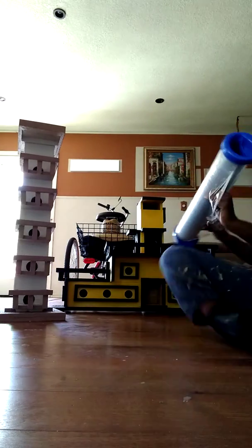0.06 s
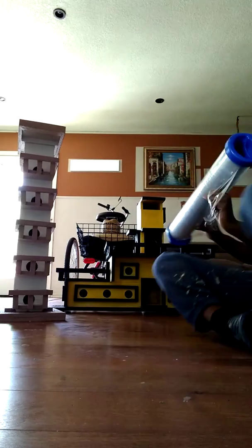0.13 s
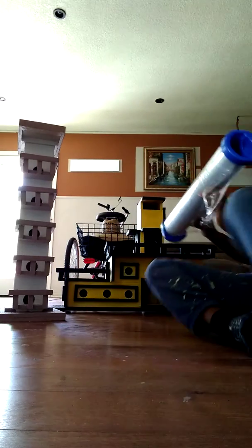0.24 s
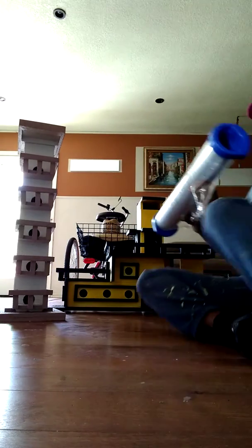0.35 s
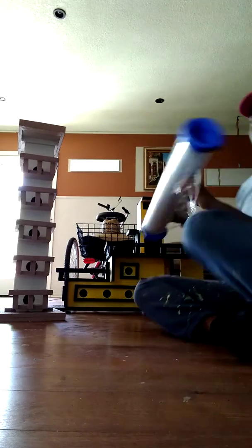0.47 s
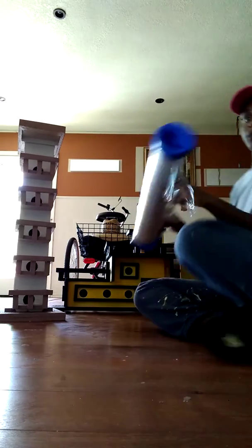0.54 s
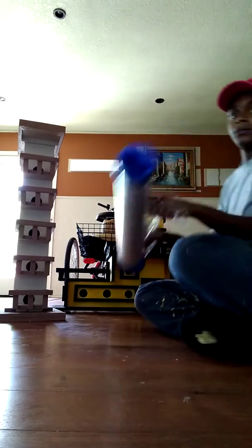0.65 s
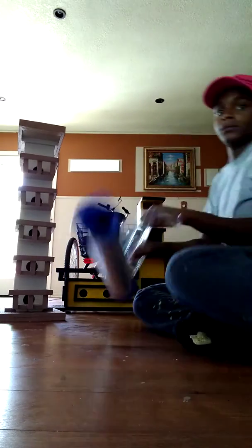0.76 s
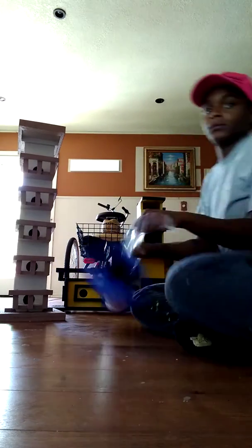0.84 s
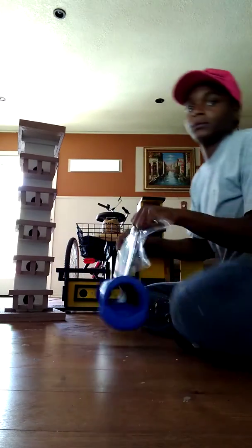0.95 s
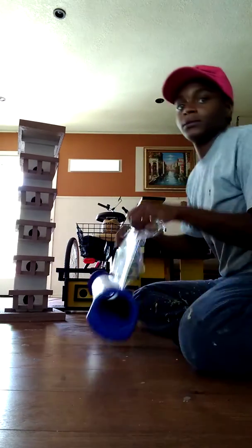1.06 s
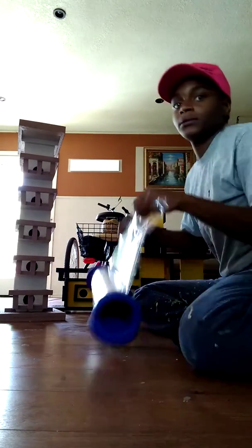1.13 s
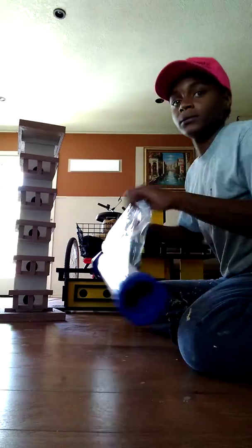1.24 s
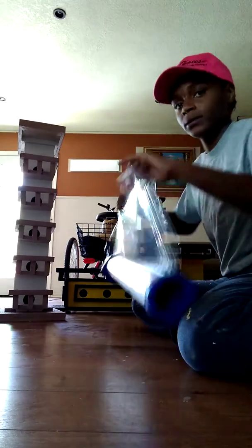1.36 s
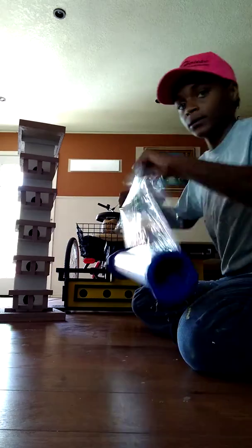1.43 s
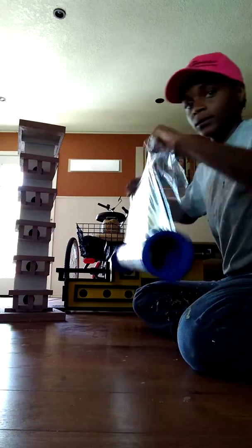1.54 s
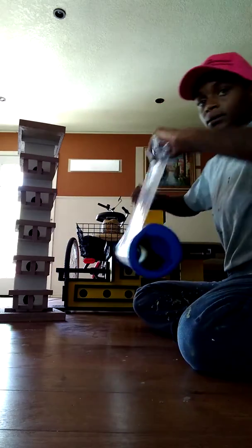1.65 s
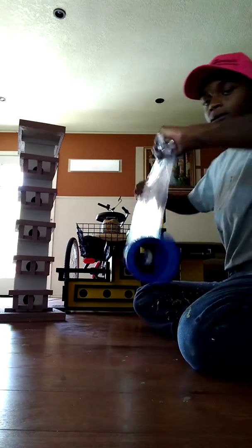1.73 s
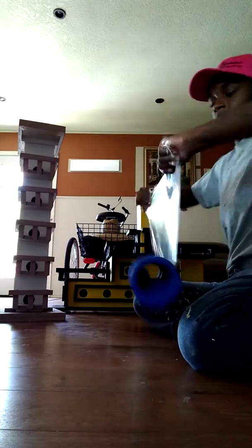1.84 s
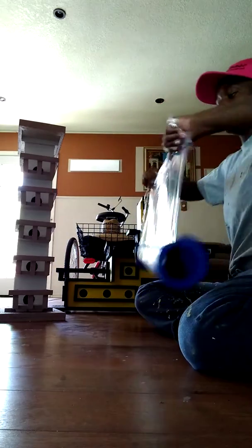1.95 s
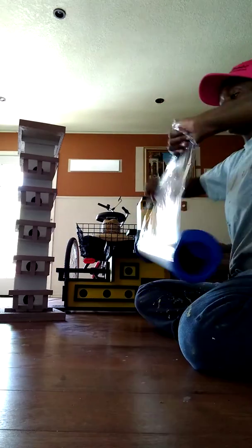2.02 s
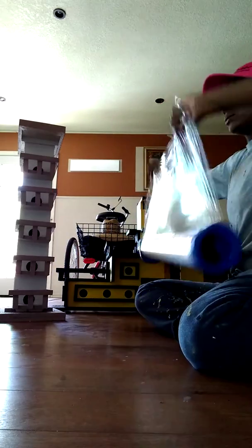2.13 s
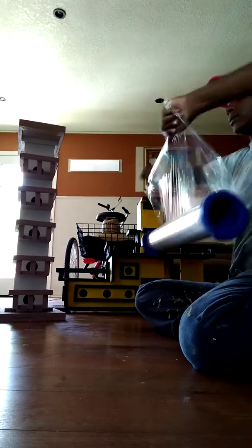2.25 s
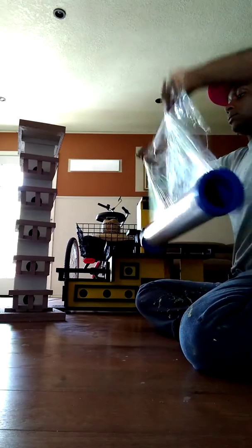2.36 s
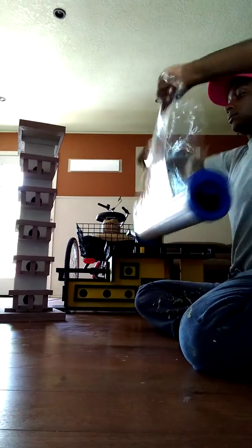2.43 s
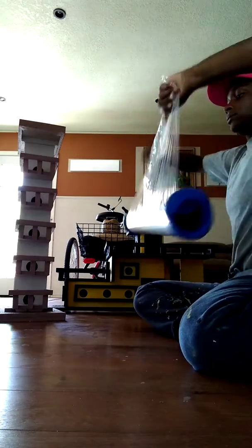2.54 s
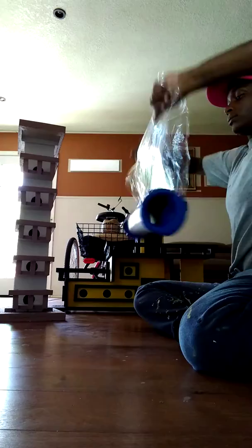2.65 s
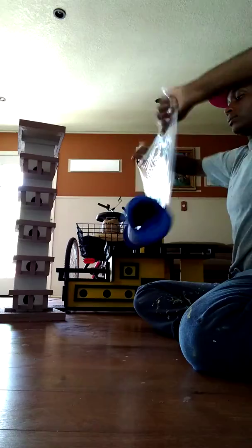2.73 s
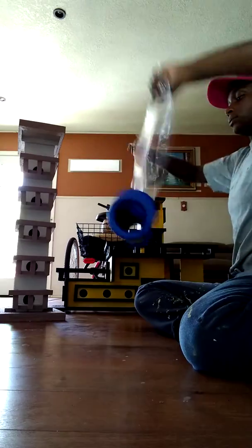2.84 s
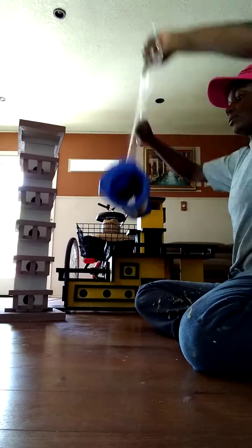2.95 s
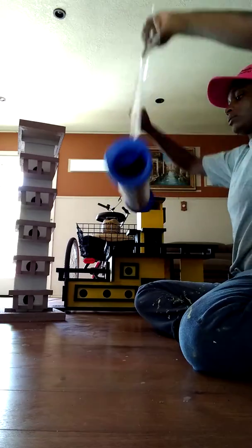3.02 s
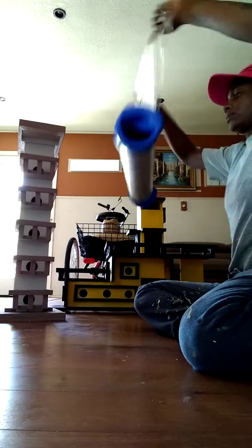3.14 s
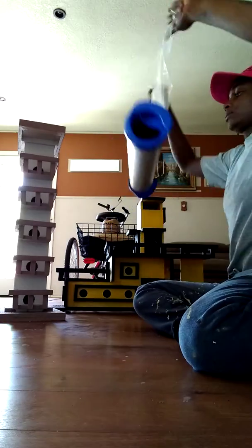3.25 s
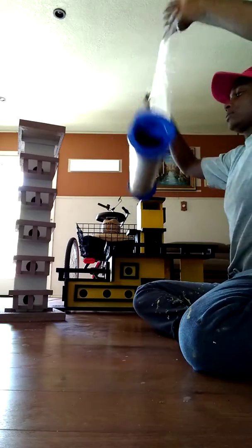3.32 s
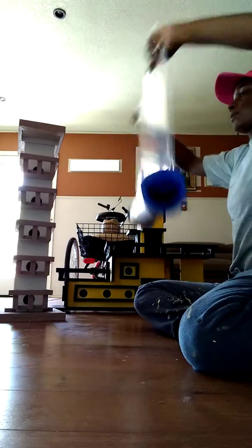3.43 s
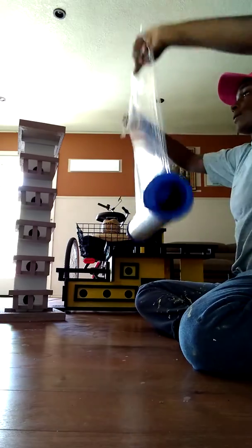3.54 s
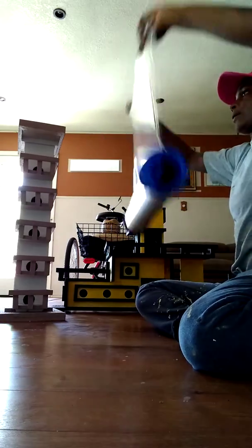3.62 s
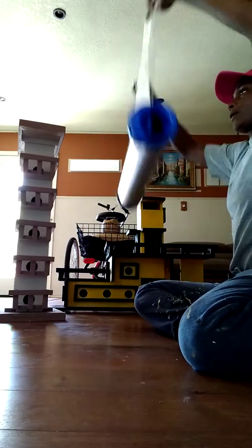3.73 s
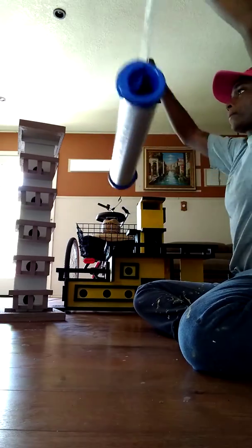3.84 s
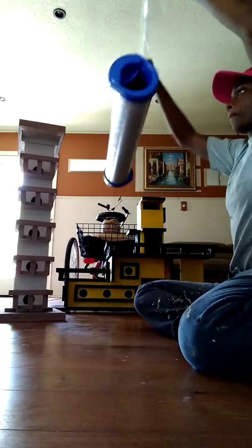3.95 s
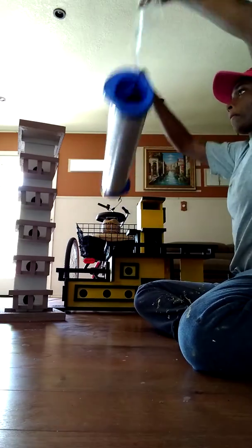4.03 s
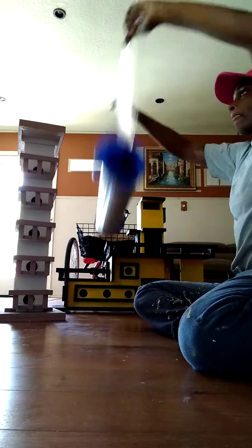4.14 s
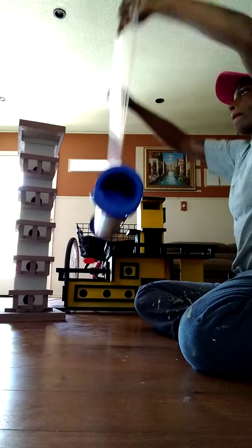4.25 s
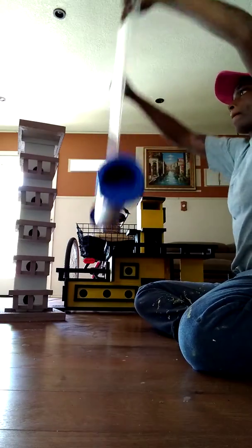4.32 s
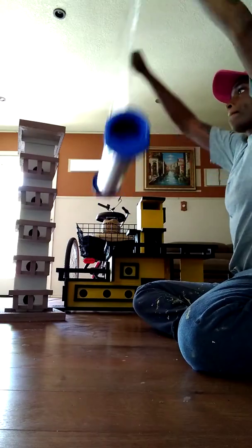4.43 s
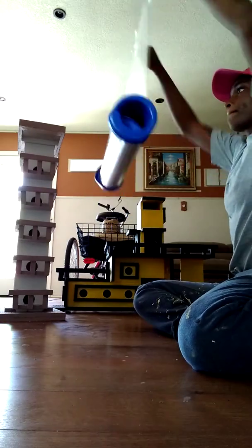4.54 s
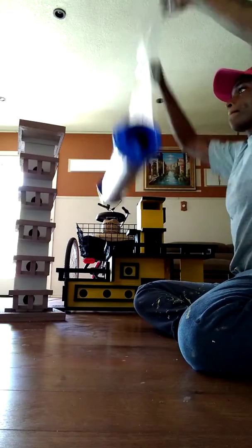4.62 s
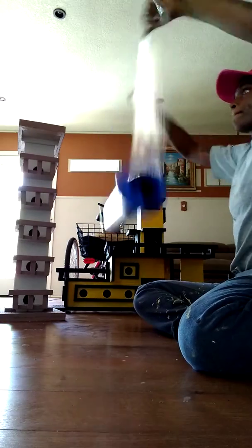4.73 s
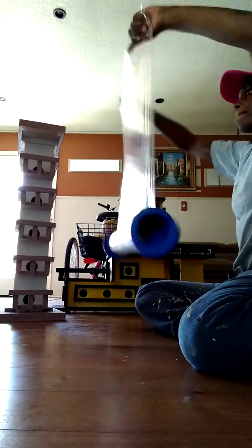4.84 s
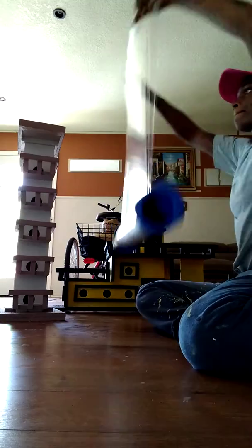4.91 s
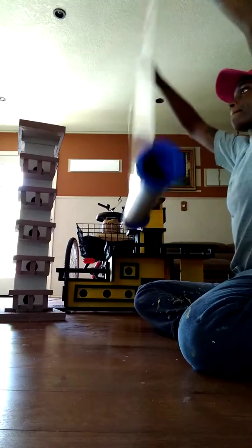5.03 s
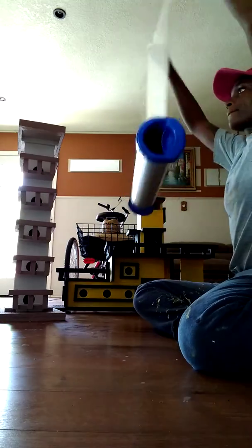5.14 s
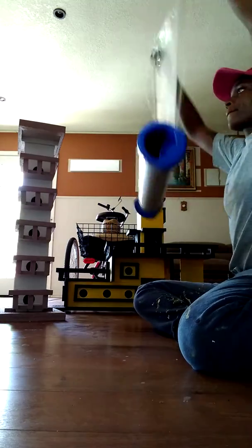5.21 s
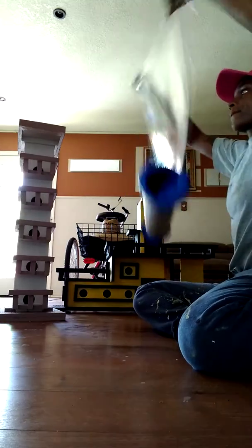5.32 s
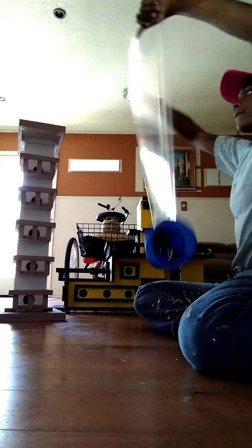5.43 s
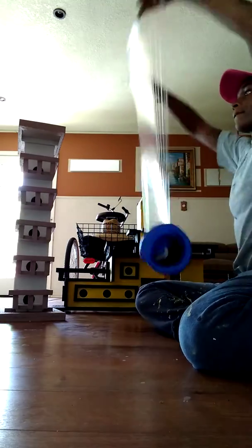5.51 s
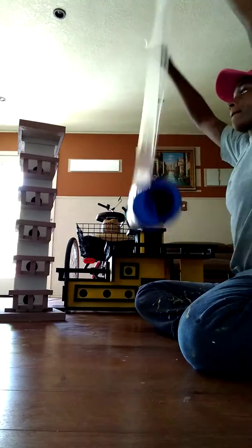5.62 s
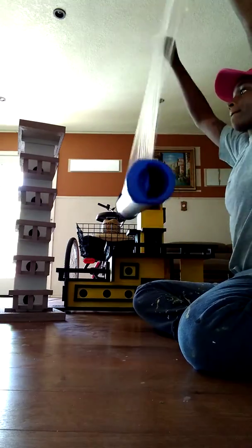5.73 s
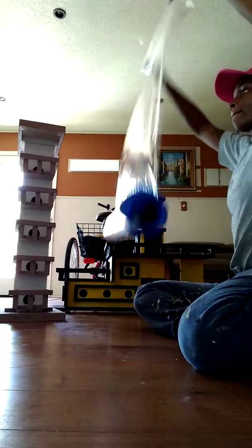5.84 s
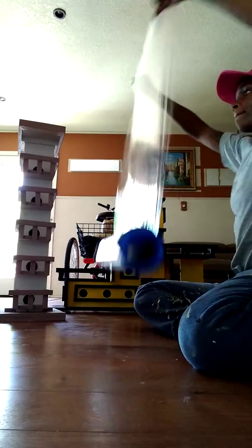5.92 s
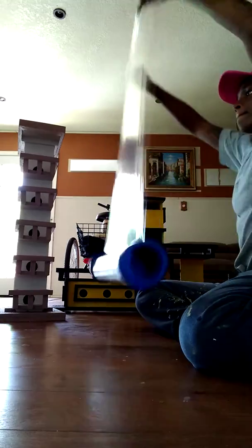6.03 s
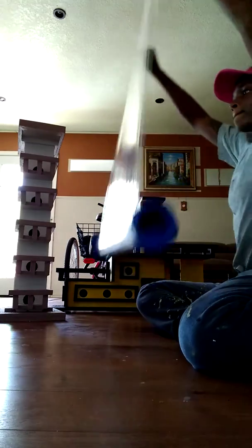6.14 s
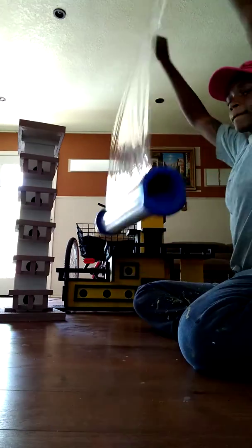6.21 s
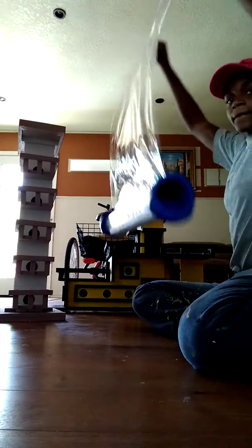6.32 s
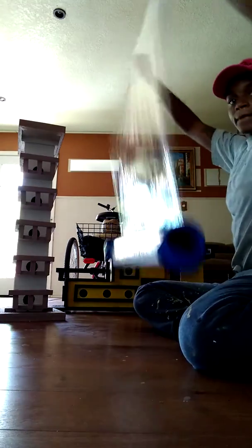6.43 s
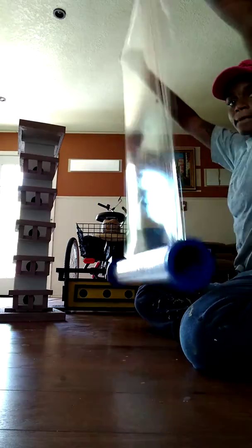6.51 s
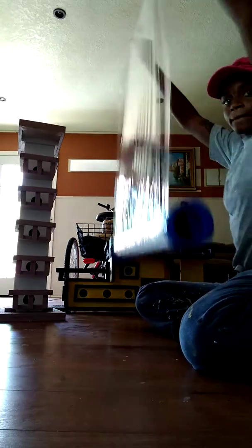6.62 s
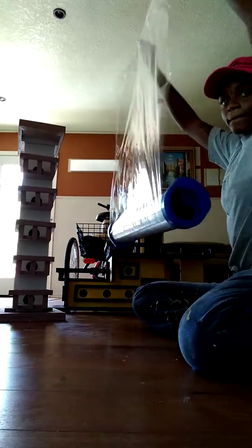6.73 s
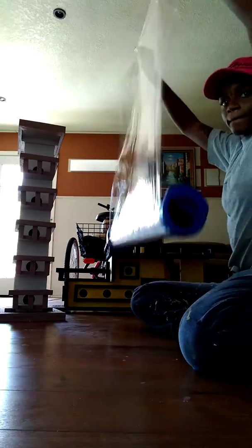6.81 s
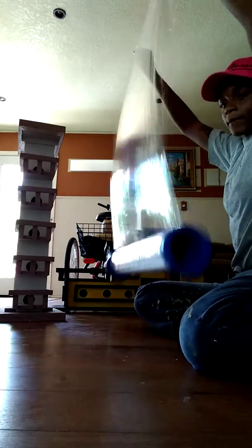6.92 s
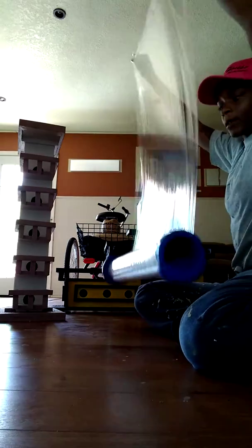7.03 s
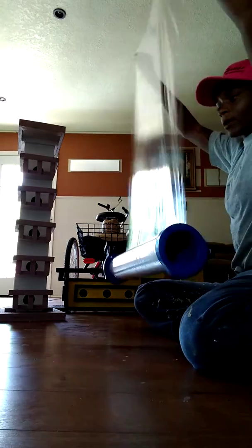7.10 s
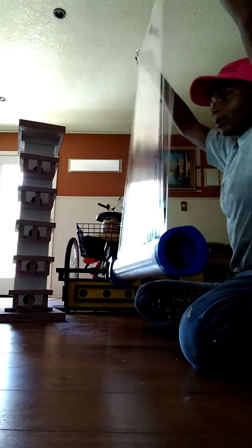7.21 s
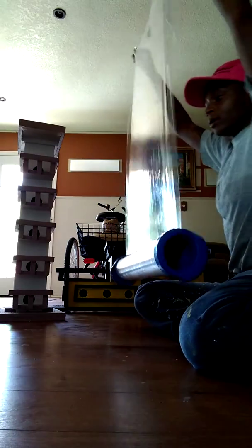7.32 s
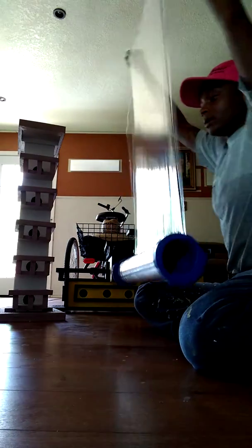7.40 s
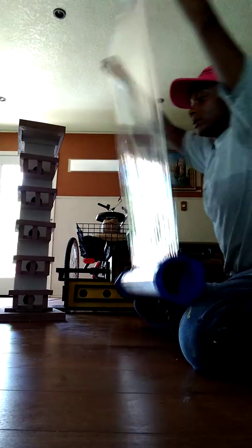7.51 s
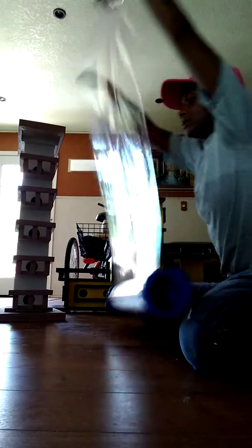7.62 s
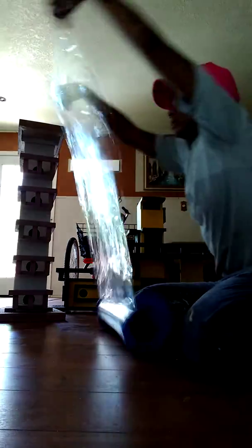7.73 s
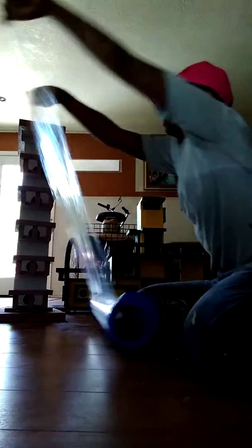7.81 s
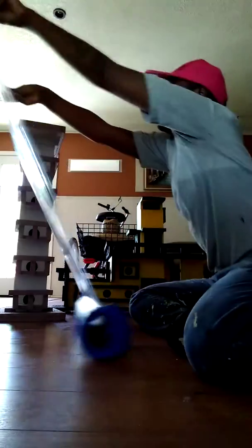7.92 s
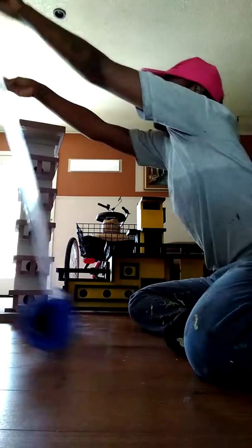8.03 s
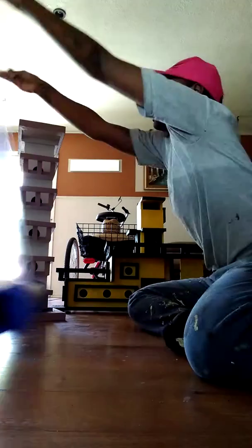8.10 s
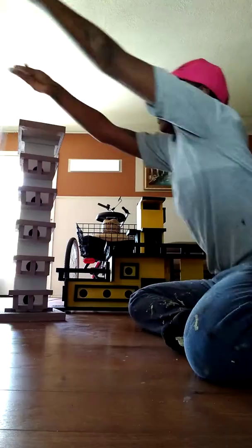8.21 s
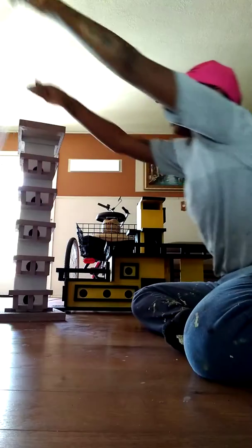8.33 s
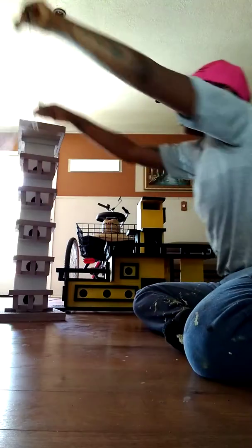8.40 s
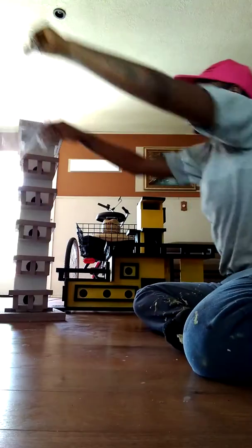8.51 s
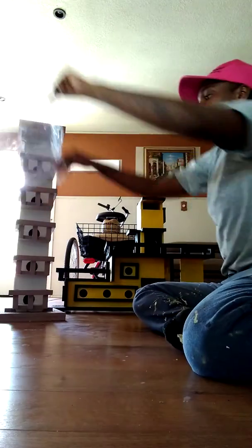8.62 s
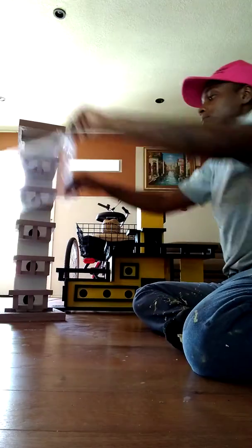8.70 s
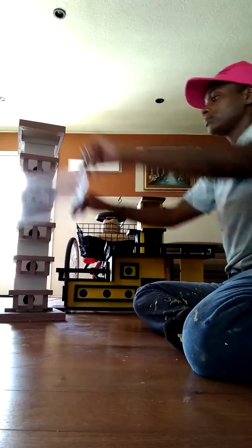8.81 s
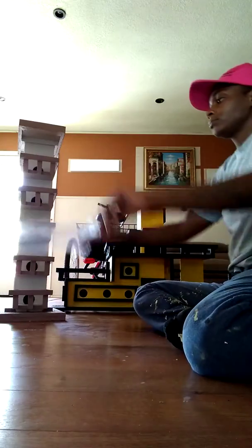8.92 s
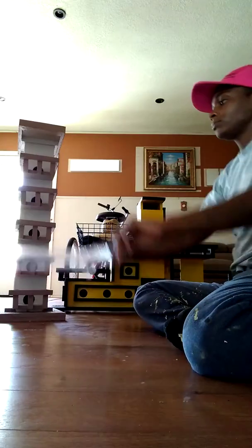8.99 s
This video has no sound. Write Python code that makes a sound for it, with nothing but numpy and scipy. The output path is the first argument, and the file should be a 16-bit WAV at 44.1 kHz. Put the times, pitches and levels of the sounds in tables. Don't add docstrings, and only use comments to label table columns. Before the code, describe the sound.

Quiet room air and faint mains hum in a living room, caught in wide stereo by a phone near a wooden floor. At 0.15 s a shoe knocks and briefly scuffs the boards. From 0.5 s clingy film is worked loose in rapid, overlapping crackly tugs, with pops near 0.8, 1.4 and a sharp one at 1.9, plus hard woody knocks at 1.0 and a lighter one at 1.6. Another tug comes at 2.9. Then come separate ripping jerks around 3.5, 4.25, a loud snapping one at 4.8, then 5.5, 6.0, 6.55 and 7.0, each a low flap with sticky crackle and hiss that dies fast. At 7.8 the hollow roll slams down, one end after the other, with a short rumble and small bounces; at 8.54 it lands again, clatters in quick knocks until 8.8 and rolls briefly away, the room ringing softly before settling into quiet.

```python
import sys
import numpy as np
from scipy import signal
from scipy.fft import rfft, irfft, next_fast_len
from scipy.io import wavfile
from scipy.ndimage import uniform_filter1d

SR = 44100
rng = np.random.default_rng(int(sys.argv[2]) if len(sys.argv) > 2 else 0)


def store_wav(level_fs):
    pcm = np.round(np.clip(np.atleast_2d(level_fs), -1, 1) * 32767)
    wavfile.write(sys.argv[1], SR, pcm.T.astype(np.int16))


def invert_db(x):
    u = np.asarray(x, float) / 20
    return 10 ** u


N = 399546
TIME = np.arange(N) / SR
STEPS = TIME[::32]
SWELL_RANGE_DB = 30


def on_log_hz(hz, table):
    table_hz, value = np.transpose(table)
    return np.interp(np.log(hz + 1), np.log(table_hz + 1), value)


def colour(x, table):
    cep = irfft(np.log(invert_db(on_log_hz(np.fft.rfftfreq(2048, 1 / SR), table))))
    cep[1:1024] *= 2
    cep[1025:] = 0
    impulse = irfft(np.exp(rfft(cep)))
    return signal.oaconvolve(np.atleast_2d(x), impulse[None], axes=1)[:, :N]


def unit(x):
    return x / np.sqrt(np.mean(x ** 2))


def band(x, kind, hz, order=2):
    return signal.sosfilt(signal.butter(order, hz, kind, fs=SR, output="sos"), x)


def slips(rate, spread_db):
    when, size, *sign = rng.random((4, N))
    happens = when < rate / SR
    loudness = invert_db(-spread_db * np.log(size + 1e-4))
    return happens * loudness * np.sign(np.array(sign) - .5)


def swell(s, db, rise_s, fall_s, bend=1):
    late = STEPS - s
    return db - SWELL_RANGE_DB * np.where(late < 0, -late / rise_s, np.abs(late / fall_s) ** bend)


def swells(peaks, rise_s, fall_s):
    return np.interp(TIME, STEPS, sum(invert_db(swell(*peak, rise_s, fall_s)) for peak in peaks))


# freq_hz, level_db
AIR_TONE = [(30, -20), (60, -0.5), (130, 6), (200, 4.5), (300, -7.5), (650, -13.5), (1500, -26),
            (3300, -32), (7500, -40.5), (15000, -40)]
# freq_hz, level_db
HUM = [
    (58.5, -55.5),
    (11908, -96.5),
]
AIR_DB = -61.5


def air():
    drift = np.repeat(rng.standard_normal(N // 4000 + 1), 4000)
    drift = uniform_filter1d(drift, 4000)[:N]
    quarter = np.array([[0], [np.pi / 2]])
    hum = sum(invert_db(db - 2.5) * np.sin(2 * np.pi * hz * TIME + quarter) for hz, db in HUM)
    return invert_db(AIR_DB + 2.3 * drift) * unit(colour(rng.standard_normal((2, N)), AIR_TONE)) + hum


CONTACT_S = .001


def blows(events, cycles, crack_s, crack_top_hz, ring_db, crack_db):
    out, t = np.zeros(N + 4096), np.arange(4096) / SR
    noise = band(rng.standard_normal((len(events), len(t))), "bandpass", [1500, crack_top_hz])
    rise = 1 - np.exp(-(t / CONTACT_S) ** 2)
    for (s, db, hz, rel_db), hiss in zip(events, noise):
        fade, turn = np.exp(-t * hz / cycles), 2 * np.pi * hz * t
        partials = 0.63 * np.sin(1.767 * turn) + 0.31 * np.sin(3.27 * turn)
        ring = fade * (np.sin(turn) + fade * partials)
        crack = invert_db(rel_db + crack_db) * np.exp(-t / crack_s) * hiss
        out[int(s * SR):][:len(t)] += invert_db(db) * rise * (invert_db(ring_db) * ring + crack)
    return out[:N]


# start_s, peak_db, ring_hz, crack_re_peak_db
KNOCKS = [(0.14, -20.5, 566, -29), (0.174, -24, 482, -10), (0.982, -15.5, 506, -10), (0.987, -13, 535, -21),
          (1.568, -24, 544, -7.5), (1.568, -25, 268, -39), (0.983, -18.5, 1120, -9), (0.985, -24, 191, -30),
          (8.018, -24.5, 570, -5), (8.097, -28.5, 605, -37.5), (8.236, -42, 603, -19.5),
          (8.371, -52, 532, 5.5), (8.565, -14.5, 490, -38.5), (8.634, -17, 476, -16),
          (8.645, -15.5, 468, -12.5), (8.667, -21, 522, -10), (8.719, -12, 483, -24),
          (8.753, -11.5, 262, -17), (8.788, -18, 448, -50)]
# start_s, peak_db, ring_hz, crack_re_peak_db
DROPS = [
    (7.783, -8, 640, -6),
    (7.8112, -2.5, 640, -3),
    (7.8145, -9, 660, -22),
    (8.5362, -9, 560, -6),
    (8.541, -8, 410, -15),
]


def knocks():
    return blows(KNOCKS + DROPS, cycles=1.6, crack_s=.002, crack_top_hz=5200, ring_db=1.7, crack_db=1.0)


# freq_hz, width_hz, level_db
TUBE = [
    [(70, 64, -7), (118, 40, 25), (199, 31, 19), (306, 44, -15), (543, 60, -25), (1320, 890, -31)],
    [(99.5, 170, -22), (170, 120, -4), (270, 93, 7.5), (390, 210, 0.5), (531, 68, 6.5), (627, 43, 8.5),
     (670, 50, -14.5), (713, 62, -22.5), (874, 27, -18.5), (1000, 150, -20), (1550, 260, -43)],
    [(71.3, 68, -20), (131, 85, 10), (275.8, 7.3, 16.5), (383, 9.7, 14), (426, 40, -22), (508, 48, 11.5),
     (653, 22, -25), (830, 58, -39), (1156, 140, -49), (2690, 75, -31)],
]
# freq_hz, level_db
GRIT = [(100, -45.5), (1000, -32.5), (2200, 9.5), (3300, -13), (5000, -21.5), (7500, -22.5), (15000, -20)]
# start_s, level_db, rolls_on_s, dies_db_per_s, grit_re_level_db
ROLLS = [
    (0.145, -43.5, 0.093, 450, -16),
    (7.783, -26, 0.12, 57, -19.5),
    (8.535, -27.5, 0.25, 127, -16),
]
# peak_s, level_db
BUMPS = [
    [(0.143, -28)],
    [(7.789, -21.5), (7.819, -15), (7.86, -28), (7.91, -31.5), (8.02, -36)],
    [(8.539, -13.5), (8.57, -25.5), (8.645, -19), (8.72, -24)],
]
GRIT_TRAILS = [
    1.1,
    0.44,
    0.95,
]
ROLL_SAG_DB_S, ROLL_BEND_DB_S2 = 9.5, 130
BUMP_RISE_S, BUMP_FALL_S = 0.0092, 0.014


def rumble():
    out = 0
    bumps = band(slips(1400, 0.5), "lowpass", 3100)
    grit = unit(colour(slips(12000, 2.6), GRIT))
    for (s, db, rolls_s, dies_db_s, grit_db), hard, tube, trails in zip(ROLLS, BUMPS, TUBE, GRIT_TRAILS):
        late = TIME - s
        dying = np.maximum(late - rolls_s, 0)
        fade = (late > 0) * invert_db(-ROLL_SAG_DB_S * late - dies_db_s * dying - ROLL_BEND_DB_S2 * dying ** 2)
        bumped = swells(hard, BUMP_RISE_S, BUMP_FALL_S)
        core = 0
        for hz, width_hz, mode_db in tube:
            mode = signal.lfilter(*signal.iirpeak(hz, hz / max(width_hz, 10), SR), bumps)
            core = core + invert_db(mode_db) * unit(mode)
        out = out + (invert_db(db) * fade + bumped) * unit(core)
        out = out + invert_db(grit_db) * (invert_db(db) * fade ** trails + bumped) * grit
    return out


# peak_s, boom_db, rise_s, fall_s, brightness_db
TUGS = [(0.514, -47, .03, 0.93, -8), (.58, -51, 0.098, 0.99, 6.5), (.735, -53.5, 0.029, .3, 14.5),
        (0.826, -32, .16, 0.3, 0.5), (1.014, -31.5, .1, 0.25, -10), (1.197, -38.5, .18, 0.23, 2),
        (1.298, -49, 0.046, .15, 22.5), (1.265, -50, 0.018, 0.22, 17), (1.39, -29, .04, 0.24, -0.5),
        (1.43, -36, .1, 0.23, 2), (1.59, -46.5, 0.21, 0.11, 3.5), (1.742, -35.5, .05, .17, 2.5),
        (1.88, -49, .1, 0.14, 0.5), (1.922, -27, .05, 0.24, 0), (2.182, -43, .05, 0.18, 3),
        (2.3, -46.5, .3, 0.2, -10), (2.392, -43.5, .25, 0.52, 1.5), (2.487, -45, .1, 0.68, 3),
        (2.62, -46.5, .3, .3, 7), (2.74, -51, .05, 0.87, -8), (2.79, -38.5, .2, 0.89, 3),
        (2.932, -28.5, .05, 0.12, -0.5), (3.2, -66.5, 0.27, 0.41, -1),
        (3.404, -46.5, 0.057, 0.49, 2), (3.527, -39.5, 0.068, 0.14, -8), (3.769, -68, .3, 0.32, 2),
         (4.245, -33.5, 0.044, 0.25, -5), (4.434, -55, .08, 0.18, -4), (4.828, -27, 0.031, 0.32, -3),
         (5.142, -57, .05, 0.08, -3), (5.419, -51.5, 0.027, 0.62, 6), (5.53, -37, 0.18, 0.9, -10.5),
         (5.598, -44, 0.2, 0.1, -1), (6.036, -30.5, 0.068, 0.29, -4), (6.56, -32, 0.07, 0.23, -0.5),
         (6.842, -61, 0.054, 0.086, -8), (6.887, -53.5, 0.027, 0.18, 6), (6.946, -41.5, 0.08, 0.22, 2),
         (7.084, -42.5, 0.1, 0.34, 4), (7.2, -61.5, 0.17, 0.088, 10), (6.73, -60.5, 0.18, 0.058, 10),
         (8.47, -58.5, 0.095, 0.46, 5), (7.69, -60.5, 0.056, .4, 7.5), (7.731, -50, .08, 0.17, 7.5),
         (8.245, -56.5, .3, 0.17, 6), (8.43, -72, 0.24, 0.34, 4), (8.52, -52, 0.17, 0.081, 3.5)]
STOPS_S = [1.638, 2.09, 3.068, 4.385, 5.044, 5.678, 6.21, 9.1]
STOP_DB_S = 352
FALL_BEND = 0.85
REST_DB = -82.5


def tugs(db=0, bright_share=0, rise=1, fall=1, lag_s=0):
    power = invert_db(2 * REST_DB * fall)
    for s, boom_db, up, down, bright_db in TUGS:
        stop_s = min(at for at in STOPS_S if at > s)
        past_stop = np.maximum(STEPS - stop_s, 0)
        tug_db = swell(s, boom_db + bright_share * bright_db, up / rise, down / fall, FALL_BEND)
        power = power + invert_db(2 * (tug_db - STOP_DB_S * past_stop))
    return invert_db(db) * np.interp(TIME - lag_s, STEPS, np.sqrt(power))


# freq_hz, level_db
FILM = [(30, -6.5), (60, 9.5), (130, 5), (300, 6), (650, -3.5), (1000, -4), (1500, -8.5), (2400, -5.5),
        (3300, -13.5), (5000, -24.5), (7500, -34), (15000, -35)]
# level_re_boom_db, brightness_share, rise_steepness, fall_steepness
FLAP = (-2.2, 0.32, 0.65, .8)
CRINKLE = (0, .4, .95, 1.05)
RASP = (0, .45, .9, 1.102)
HISS = (9.9, 1.065, 0.83, 1.3)
# peak_s, level_db
SWINGS = [(.64, -39), (1.02, -42), (1.1, -39), (1.44, -32), (1.59, -42), (2.39, -37), (2.66, -48),
          (3.05, -50), (5.6, -40), (6.12, -47), (6.68, -53), (6.96, -44), (7.23, -47), (7.75, -44),
          (8.14, -47), (8.47, -44)]
SWING_RISE_S, SWING_FALL_S = 0.13, 0.1
SLIPS_PER_S, SLIP_SPREAD_DB = 6000, 2.8
CLUMP_S, CLUMP_DB = .005, 2
FLAP_LAG_S = 0.022


def peel():
    hold = int(CLUMP_S * SR)
    clumps = np.repeat(rng.standard_normal(N // hold + 1), hold)
    clumps = uniform_filter1d(clumps, hold // 2)[:N]
    film = unit(colour(invert_db(CLUMP_DB * clumps) * slips(SLIPS_PER_S, SLIP_SPREAD_DB), FILM))
    flap = band(film, "lowpass", 150)
    boom = band(film, "lowpass", 700) - flap
    crinkle = band(film, "lowpass", 1500) - boom - flap
    hiss = band(film, "highpass", 5000)
    rasp = film - flap - boom - crinkle - hiss
    sheet = tugs() * boom + tugs(*CRINKLE) * crinkle + tugs(*RASP) * rasp + tugs(*HISS) * hiss
    swings = swells(SWINGS, SWING_RISE_S, SWING_FALL_S)
    return invert_db(0.5) * (sheet + (tugs(*FLAP, FLAP_LAG_S) + swings) * flap)


# start_s, peak_db, ring_hz, crack_re_peak_db
SNAPS = [(0.514, -34.5, 230, -36), (0.798, -25.5, 790, -15), (0.815, -45, 2600, -13),
         (1.284, -36, 2980, -9), (1.12, -46, 2900, -5), (1.359, -24, 674, -6.5), (1.379, -41, 471, -14.5),
         (1.703, -51, 601, -4), (1.732, -33, 740, -4.5), (1.878, -38.5, 659, -3), (1.89, -36, 2360, -7),
         (1.91, -18, 610, -9), (2.162, -34, 204, -13.5), (2.376, -30.5, 247, -13), (2.734, -41, 640, -10),
         (2.918, -27, 870, -12), (1.703, -53, 2400, -6), (4.221, -30, 280, -15), (4.42, -45, 276, -9.5),
         (4.811, -22.5, 640, -17.5), (4.823, -17.5, 596, -34), (5.143, -63, 202, 5),
         (5.499, -31.5, 520, -23.5), (6.002, -32, 293, -16), (6.028, -26.5, 560, -22),
         (6.51, -37, 524, -13), (6.842, -48, 390, -15), (6.885, -40, 627, -13), (7.063, -38.5, 382, -4),
         (7.72, -44, 1260, 2)]


def snaps():
    return blows(SNAPS, cycles=1.57, crack_s=0.0049, crack_top_hz=12000, ring_db=-0.6, crack_db=1.5)


ROOM_T60_S, ROOM_TREBLE_T60_S, ROOM_DB = 0.37, 0.4, -5
FIRST_ECHO_S = .005


def room(x):
    t = np.arange(SR) / SR
    noise = rng.standard_normal((2, SR))
    low = band(noise, "lowpass", 2800, order=1)
    tail = low * 1000. ** (-t / ROOM_T60_S) + (noise - low) * 1000. ** (-t / ROOM_TREBLE_T60_S)
    tail *= np.clip(t / FIRST_ECHO_S, 0, 1)
    return signal.oaconvolve(x, invert_db(ROOM_DB) * unit(tail) / np.sqrt(SR), axes=1)[:, :N]


# freq_hz, level_db
PORTS = [(40, -24), (120, -22.5), (300, -22.5), (450, -13.5), (650, -9.5), (1000, -1), (1500, 0.5),
         (15000, -0.5)]


def scene():
    hits = snaps() + knocks()
    size = next_fast_len(N)
    hits = np.array([hits, irfft(1j * rfft(hits, size), size)[:N]])
    steady = peel() + rumble()
    both, apart = hits + steady + room(hits + 0.48 * steady) + air()
    port_gain = invert_db(on_log_hz(np.fft.rfftfreq(size, 1 / SR), PORTS))
    apart = irfft(rfft(apart, size) * port_gain, size)[:N]
    return np.array([both + apart, both - apart])


def roll_off(x):
    return signal.sosfilt(signal.butter(12, 16470, fs=SR, output="sos"), x)


# freq_hz, level_db
RIGHT_PORT = [(1000, 0), (2500, 2), (4000, 4), (6000, 5), (8500, 8.5), (10500, 6.5), (15000, 5)]
# freq_hz, lag_samples
CROSS_LAG = [(0, 20.0), (5600, 19.8), (7750, 19.9), (8750, 20.15), (9750, 20.4), (10600, 20.8),
             (22050, 20.9)]
# freq_hz, share
CROSS_SHARE = [(100, .72), (1100, .8), (2200, .81), (4400, .76), (7000, .84), (9000, .63), (11500, .38),
               (15000, .26)]
EVENED = 0.66


def record(dry):
    size = next_fast_len(N + 512)
    hz = np.fft.rfftfreq(size, 1 / SR)
    lag = np.interp(hz, *np.transpose(CROSS_LAG))
    cross = np.clip(on_log_hz(hz, CROSS_SHARE), 0, .95) * np.exp(-2j * np.pi * hz * lag / SR)
    tilt_db = on_log_hz(hz, RIGHT_PORT) * np.array([[-.5], [.5]])
    ports = rfft(dry, size) * invert_db(tilt_db)
    wide = irfft((ports - ports[::-1] * cross) * invert_db(-EVENED * tilt_db), size)[:, :N]
    wide = band(wide, "highpass", 50, order=3)
    wide = band(wide, "lowpass", 15300, order=24)
    return roll_off(np.clip(wide, -1, 1))


dry = scene()
out = record(dry)
store_wav(out)
```